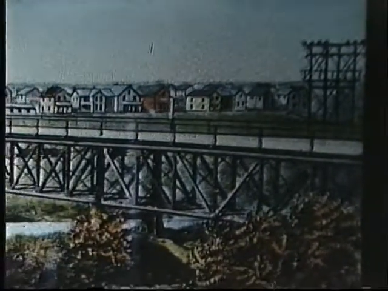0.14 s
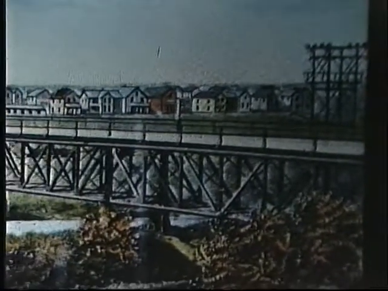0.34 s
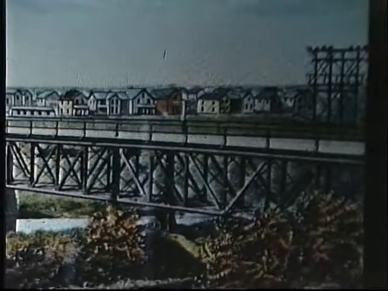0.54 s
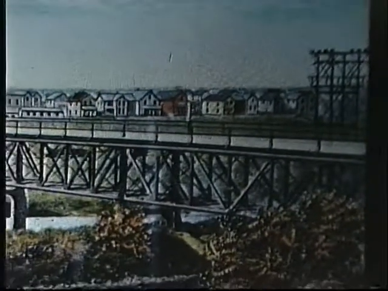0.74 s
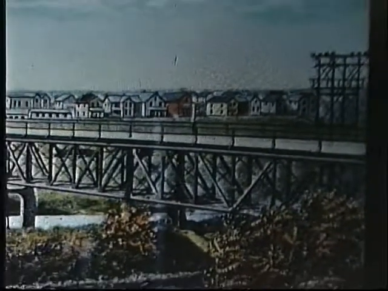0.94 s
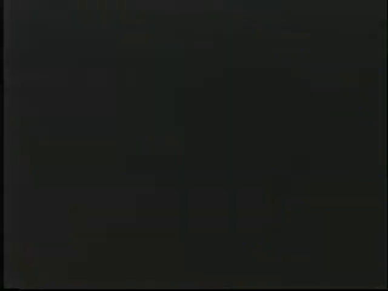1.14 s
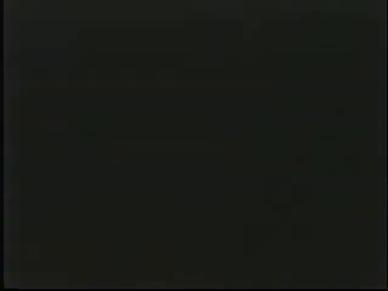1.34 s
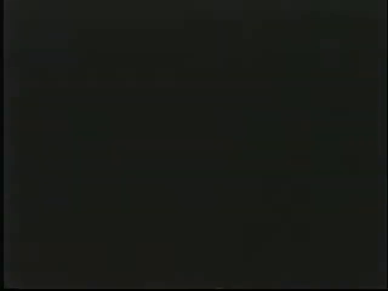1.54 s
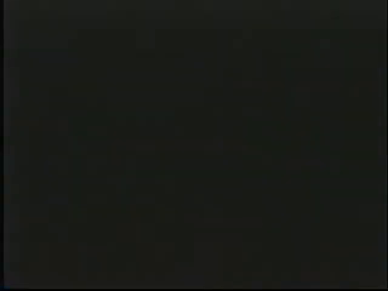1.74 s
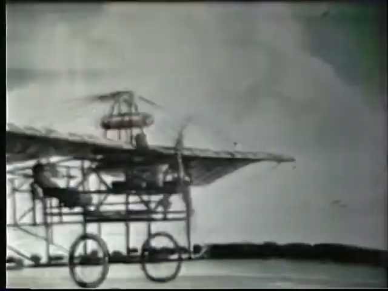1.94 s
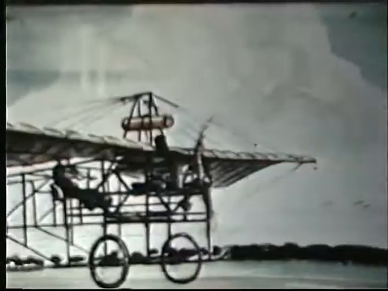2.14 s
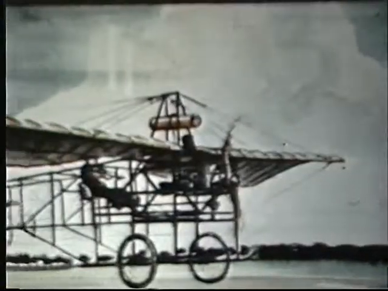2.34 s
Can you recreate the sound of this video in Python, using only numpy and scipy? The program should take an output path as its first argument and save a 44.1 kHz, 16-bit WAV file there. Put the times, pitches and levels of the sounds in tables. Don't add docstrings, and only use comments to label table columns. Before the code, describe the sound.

A slide projector changes its slide in a small room, heard a few metres away. A faint tick at 0.07 s, then only fan air, low hum and tape hiss. From about 0.95 s levers scrape and rattle, building with dull casing knocks to a loud metallic clack at 1.52 s. Smaller rattles follow around 1.75 s, clicks and thuds at 2.0-2.15 s, then steady hiss.

```python
import sys
import numpy as np
from scipy import signal
from scipy.fft import rfft, irfft
from scipy.io import wavfile
from scipy.ndimage import uniform_filter1d

SR = 44100
rng = np.random.default_rng(int(sys.argv[2]) if len(sys.argv) > 2 else 0)


def nominal_scale(level):
    x = np.asarray(level, float) / 20
    return 10 ** x


def put_to_file(sound):
    columns = np.atleast_2d(sound).T
    safe = np.clip(columns, -1, 1)
    whole_steps = np.round(safe * 32767)
    wavfile.write(sys.argv[1], SR, whole_steps.astype(np.int16))


N = 110161


def unit(x):
    return x / np.sqrt(np.mean(np.abs(x) ** 2))


def lowpass(x, order, hz):
    return signal.sosfilt(signal.butter(order, hz, fs=SR, output="sos"), x)


def fade(t, t60):
    return np.exp(-np.log(1000) * t / t60)


def walk(rate_hz):
    k = int(SR / rate_hz)
    return unit(uniform_filter1d(uniform_filter1d(rng.standard_normal(N), k), k))


def ring(x, body):
    hz = np.arange(N // 2 + 1) * SR / N + 0.01
    gain = 0
    for k, (f, width, db) in enumerate(body):
        detune = (hz / f - f / hz) * f / (2 * width)
        gain = gain + (-1) ** k * nominal_scale(db) / (1 + 1j * detune) ** 2
    return irfft(rfft(x) * unit(gain), N)


# f/Hz, level/dB per Hz
HISS_SPECTRUM = [(200, -19), (600, -4.5), (1200, 0.5), (2000, 0.5), (3000, -3.5), (5000, -7), (8000, -9.5),
                 (12000, -12)]
HISS_DB = -76.5


def hiss():
    hz = np.arange(N // 2 + 1) * SR / N + 1
    f, level = np.transpose(HISS_SPECTRUM)
    db = np.interp(np.log(hz), np.log(f), level, left=-50)
    return nominal_scale(HISS_DB) * unit(irfft(rfft(rng.standard_normal(N)) * nominal_scale(db), N))


# f/Hz, width/Hz, level/dB
FAN_DUCT = [(200, 51, -9), (227.4, 43.5, -8.5), (340.8, 43, 2), (444, 150, -9.5), (478, 29.3, 1.5),
            (677, 54, 0.5), (820, 72, -7), (877, 72, -4), (982, 75, -6)]
# f/Hz, level/dB rms
FAN_TONES = [(59.9, -79.5), (1462, -90), (1981, -95)]
FAN_DB, FAN_FLUTTER_DB = -72, 1.5
RUMBLE_HZ, RUMBLE_DB = 61.6, -86


def fan(t):
    air = 0
    for hz, width, db in FAN_DUCT:
        flutter = nominal_scale(db + FAN_FLUTTER_DB * walk(15))
        air = air + flutter * ring(rng.standard_normal(N), [(hz, width, 0)]) * np.sqrt(width)
    tones = 0
    for hz, db in FAN_TONES:
        phase = 2 * np.pi * hz * t + 0.2 * walk(0.95)
        tones = tones + nominal_scale(db) * np.sqrt(2) * np.sin(phase)
    rumble = lowpass(rng.standard_normal(N), 6, RUMBLE_HZ * 3.43)
    return nominal_scale(FAN_DB) * unit(air) + tones + nominal_scale(RUMBLE_DB) * unit(rumble)


ROOM_T60_S, ROOM_TREBLE_T60_S, ROOM_SPLIT_HZ = 0.27, 0.12, 1040
ROOM_DB, ROOM_GAP_S = -7, 0.0048


def room(x):
    t = np.arange(SR // 2) / SR
    noise = rng.standard_normal(len(t))
    low = lowpass(noise, 1, ROOM_SPLIT_HZ)
    tail = low * fade(t, ROOM_T60_S) + (noise - low) * fade(t, ROOM_TREBLE_T60_S)
    tail = tail * (t > ROOM_GAP_S)
    return x + nominal_scale(ROOM_DB) * signal.fftconvolve(x, tail / np.sqrt(np.sum(tail ** 2)))[:N]


RISE_S, FALL_S, RATTLE_PER_S, RATTLE_SCATTER_DB = 0.0022, 0.005, 6000, 3.5


def rattle(t, strokes, bodies):
    chance = rng.random((3, N))
    hit = chance[0] < RATTLE_PER_S / SR
    size = nominal_scale(-RATTLE_SCATTER_DB * np.log(chance[2] + 0.01))
    knocks = unit(hit * np.sign(chance[1] - 0.5) * size)
    power = 0
    for start, length, *db in strokes:
        rise = np.clip((t - start) / RISE_S, 0, 1)
        fall = np.exp(-np.clip(t - start - length, 0, 1) / FALL_S)
        power = power + (nominal_scale(db)[:, None] * rise * fall) ** 2
    return sum(ring(knocks * np.sqrt(p), body) for p, body in zip(power, bodies))


# f/Hz, width/Hz, level/dB
METAL = [(1020, 190, 3.5), (1350, 190, 0.5), (1724, 280, 4.5), (2174, 207, 2), (2470, 220, 1.5),
         (3100, 640, -5), (3506, 114, -6), (3950, 180, 5.5)]
EDGE = [(3887, 504, 2.5), (4870, 590, -4.5), (5800, 590, -6), (7240, 1900, -13), (8770, 540, -13),
        (9680, 470, -14.5), (12300, 610, -30)]
PANEL = [(270, 89, -11), (345, 47, -1.5), (418, 36, -1), (490, 25.4, -3)]
LID = [(594, 97, -3), (679, 42, -0.5), (810, 62, 2), (936, 41, -5), (1009, 110, -4)]
TABLE = [(176.4, 52, 2.5), (206, 12, -15), (238.3, 17, -2.5), (95, 16, -7.5)]
# t/s, rattle length/s, metal level/dB, bright edge level/dB
LEVERS = [(0.078, 0.11, -86, -83.5), (0.956, 0.025, -81, -94), (1.039, 0.061, -76.5, -81),
          (1.102, 0.047, -75, -84), (1.142, 0.051, -72.5, -77), (1.201, 0.048, -73, -79.5),
          (1.243, 0.032, -69, -72), (1.289, 0.014, -69, -78), (1.312, 0.027, -65.5, -67),
          (1.344, 0.062, -65.5, -66.5), (1.383, 0.064, -66.5, -73.5), (1.452, 0.024, -71.5, -81),
          (1.48, 0.035, -68.5, -72), (1.509, 0.0057, -51.5, -48.5), (1.5175, 0.011, -45, -48.5),
          (1.533, 0.012, -47, -52.5), (1.544, 0.0089, -54, -58), (1.552, 0.013, -54.5, -60),
          (1.568, 0.02, -60.5, -71), (1.592, 0.029, -68.5, -75.5), (1.62, 0.029, -73, -81),
          (1.675, 0.091, -74.5, -77.5), (1.73, 0.032, -69, -69.5), (1.746, 0.034, -68.5, -73),
          (1.778, 0.032, -71, -73.5), (1.822, 0.06, -71, -75), (1.885, 0.069, -75.5, -84),
          (2, 0.034, -69.5, -71.5), (2.034, 0.058, -73, -80), (2.392, 0.0085, -72, -81)]
# t/s, length/s, panel level/dB, lid level/dB, table level/dB
JOLTS = [(0.068, 0.0063, -71, -74.5, -78), (0.973, 0.058, -75, -82, -81.5),
         (1.097, 0.061, -77, -82.5, -82.5), (1.155, 0.043, -79, -75.5, -78), (1.211, 0.063, -70, -76, -68),
         (1.244, 0.044, -64.5, -73, -77), (1.298, 0.046, -67, -71, -68.5), (1.353, 0.066, -62, -65.5, -69),
         (1.423, 0.03, -71, -65.5, -62.5), (1.475, 0.024, -62.5, -66, -67),
         (1.526, 0.033, -61.5, -54, -59.5), (1.578, 0.052, -67.5, -72, -73),
         (1.68, 0.091, -73.5, -73.5, -88), (1.766, 0.02, -75, -78, -67.5), (1.803, 0.065, -75.5, -80, -78),
         (1.86, 0.024, -76, -75, -68), (1.915, 0.05, -72.5, -85, -78), (2.013, 0.036, -82, -72, -71.5),
         (2.07, 0.048, -68, -68.5, -84), (2.13, 0.0031, -64, -72, -90), (2.16, 0.031, -79, -101, -81)]


def changer(t):
    return rattle(t, LEVERS, (METAL, EDGE)) + rattle(t, JOLTS, (PANEL, LID, TABLE))


# t/s, f/Hz, level/dB, t60/s
SPRING_PINGS = [(.0678, 2520, -61, 0.014), (.068, 1870, -57, 0.0042), (.068, 1290, -57, 0.0067),
                (.0679, 740, -57.5, 0.014), (.957, 2010, -65.5, 0.033), (1.033, 3830, -73, .04),
                (1.051, 3840, -75, .025), (1.069, 3840, -70.5, 0.046), (1.072, 2110, -69, .06),
                (1.149, 3930, -70, .03), (1.151, 2030, -71, 0.032), (1.171, 2240, -67, 0.046),
                (1.212, 3980, -73, 0.027), (1.218, 2070, -64, .035), (1.247, 3930, -66, 0.023),
                (1.247, 1965, -63.5, .06), (1.247, 10080, -68, 0.023), (1.249, 6890, -67, 0.036),
                (1.268, 5840, -70, .03), (1.318, 1710, -65, 0.089), (1.349, 10100, -66.5, .05),
                (1.36, 4840, -68, .03), (1.382, 2170, -60, 0.041), (1.41, 3900, -72, 0.044),
                (1.44, 1780, -57, 0.067), (1.732, 5820, -69, .05), (1.734, 8800, -69, 0.037),
                (1.745, 4000, -65, .04), (1.775, 5930, -68, 0.055), (1.835, 3930, -67, 0.041),
                (2.003, 5940, -65, .04), (2.0028, 1970, -58, 0.017), (2.003, 9750, -70, 0.023),
                (2.011, 6620, -72, .034), (2.016, 5910, -65, .042), (2.016, 1680, -66, .03),
                (2.018, 1010, -70, 0.034), (2.028, 7000, -79, .037), (2.034, 1850, -64, .03),
                (2.07, 2000, -71, .04)]
# t/s, f/Hz, level/dB, t60/s
SLIDE_DROP = [(1.514, 11840, -59, .025), (1.527, 12200, -75, .02), (1.5175, 1980, -42, 0.065),
              (1.518, 4880, -43, 0.045), (1.518, 3860, -55, 0.028), (1.519, 5600, -51, 0.043),
              (1.52, 6260, -52.5, 0.05), (1.522, 3334, -54, 0.054), (1.5243, 1930, -45, 0.042),
              (1.5245, 1710, -43.5, 0.037), (1.528, 7360, -56, 0.034), (1.531, 2950, -50.5, 0.073),
              (1.533, 1392, -48.5, 0.074), (1.538, 1624, -41, 0.03), (1.536, 805, -49, 0.09),
              (1.556, 1220, -47.5, 0.037)]
# t/s, f/Hz, level/dB, t60/s
THUDS = [(1.19, 151, -62.5, 0.11), (1.214, 380, -57.5, 0.17), (1.235, 159.6, -55, 0.16),
         (1.262, 683, -59, 0.11), (1.276, 732, -60, .09), (1.31, 426, -67, 0.13), (1.25, 488, -68, 0.086),
         (1.325, 490, -58, .1), (1.358, 445, -52.5, 0.13), (1.372, 490, -57, 0.079),
         (1.384, 421, -53.5, .12), (1.535, 148, -57, 0.14), (1.77, 496, -64.5, 0.09),
         (1.785, 135, -62.5, 0.069), (1.84, 683, -69, 0.091), (1.875, 134, -64, .08),
         (1.9, 329, -60.5, 0.16), (2.015, 139, -64.5, 0.1), (2.0765, 814, -57.5, 0.066),
         (2.084, 792, -57.5, 0.055), (2.079, 430, -57, 0.074), (2.087, 480, -56.5, 0.071),
         (2.086, 605, -64, 0.069), (2.094, 935, -64, 0.038), (2.097, 345, -53.5, 0.052),
         (2.108, 760, -60, 0.055), (2.128, 345, -56, 0.048), (2.13, 780, -63, 0.049)]
STRIKE_CYCLES = 0.23


def struck_parts(t):
    sound = 0
    for start, hz, db, t60 in SPRING_PINGS + SLIDE_DROP + THUDS:
        since = np.clip(t - start, 0, 1)
        onset = np.tanh(since * hz / STRIKE_CYCLES)
        sound = sound + nominal_scale(db) * onset * np.sin(2 * np.pi * hz * since) * fade(since, t60)
    return sound


def scene():
    t = np.arange(N) / SR
    return (room(changer(t) + struck_parts(t)) + fan(t) + hiss())[None]


# low f/Hz, high f/Hz, threshold level/dB
LOST_BANDS = [(88, 165, -83), (165, 260, -85), (11400, 13200, -82)]
GATE_S = 0.031


def lose_faint_bands(x):
    hz, spectrum, k = np.arange(N // 2 + 1) * SR / N, rfft(x), int(GATE_S * SR)
    for low_hz, high_hz, db in LOST_BANDS:
        band = irfft(spectrum * (hz > low_hz) * (hz <= high_hz), N)
        power = uniform_filter1d(uniform_filter1d(band ** 2, k), k)
        is_open = uniform_filter1d(1.0 * (power > nominal_scale(2 * db)), k // 2)
        x = x - band * (1 - is_open)
    return x


TAPE_TOP_HZ = 12850
CONVERTER_OFFSET, GRAIN_DB = 0.02927, -90.5


def band_limit(x):
    return signal.sosfilt(signal.butter(12, 14960, fs=SR, output="sos"), x)


def record(dry):
    top_cut = signal.ellip(8, 0.2, 60, TAPE_TOP_HZ, fs=SR, output="sos")
    tape = signal.sosfilt(top_cut, lose_faint_bands(dry[0])[None])
    grain = nominal_scale(GRAIN_DB) * rng.standard_normal(N)
    return band_limit(tape + CONVERTER_OFFSET + grain)


dry = scene()
out = record(dry)
put_to_file(out)
```